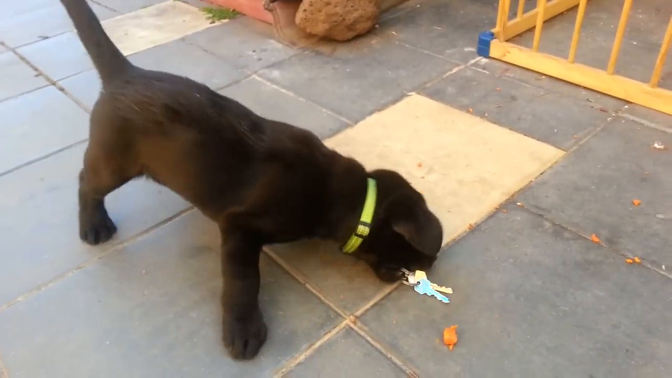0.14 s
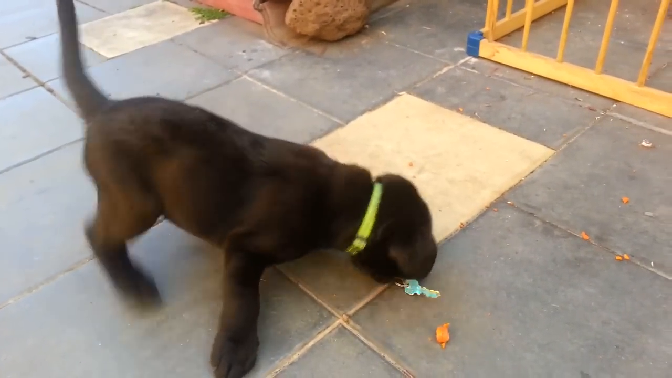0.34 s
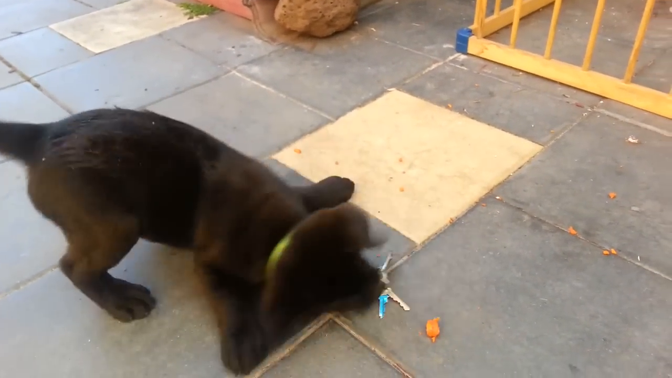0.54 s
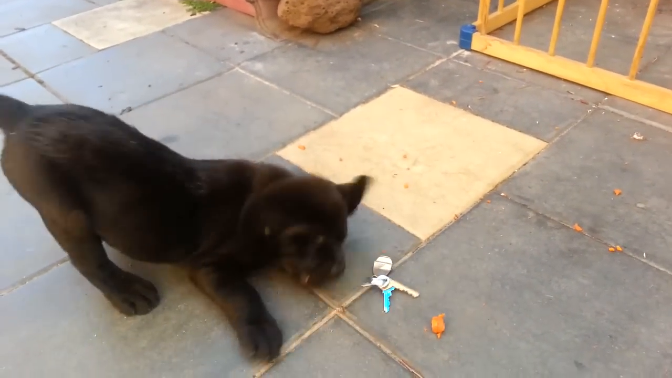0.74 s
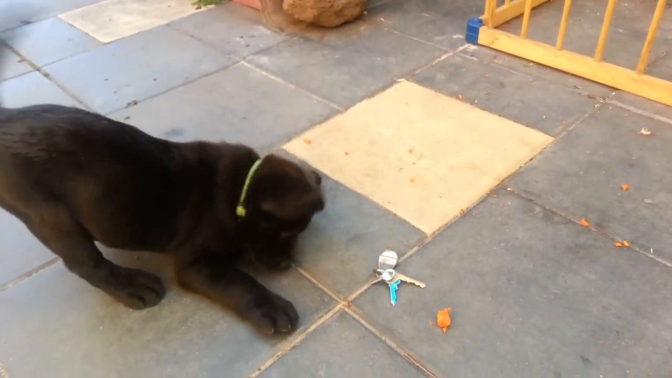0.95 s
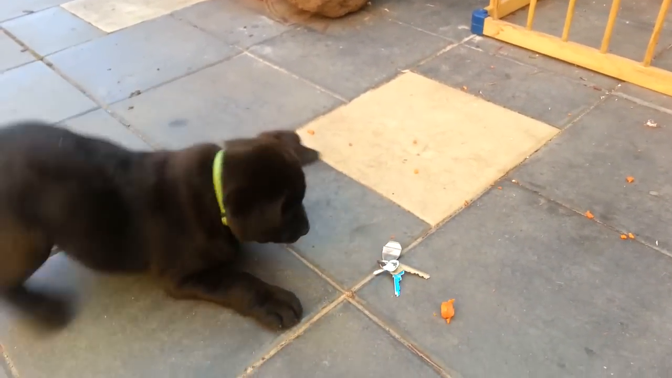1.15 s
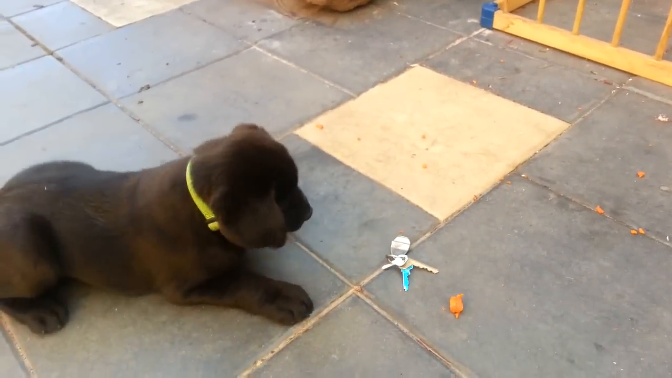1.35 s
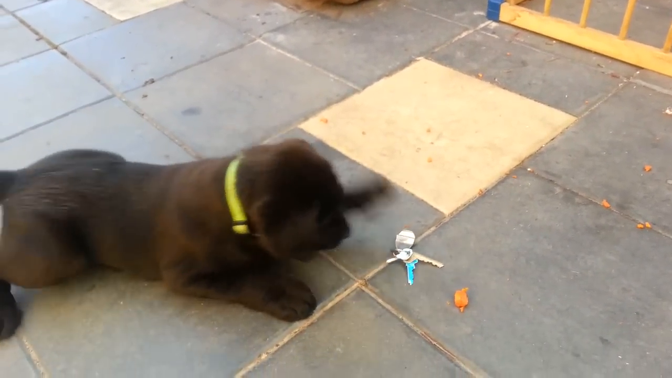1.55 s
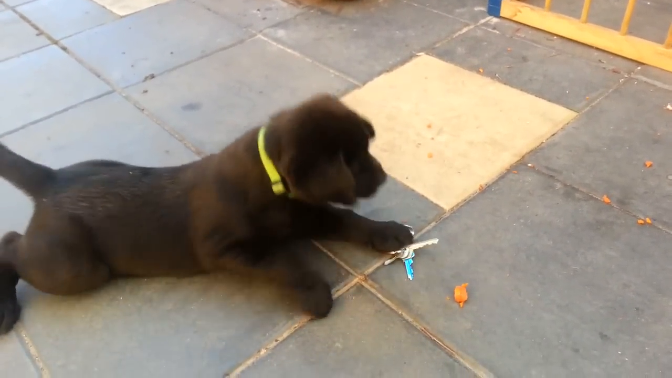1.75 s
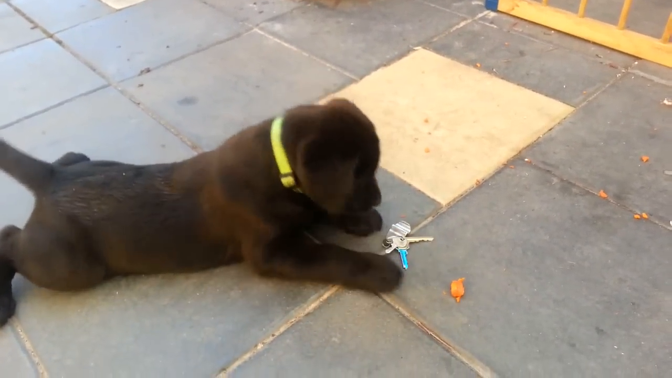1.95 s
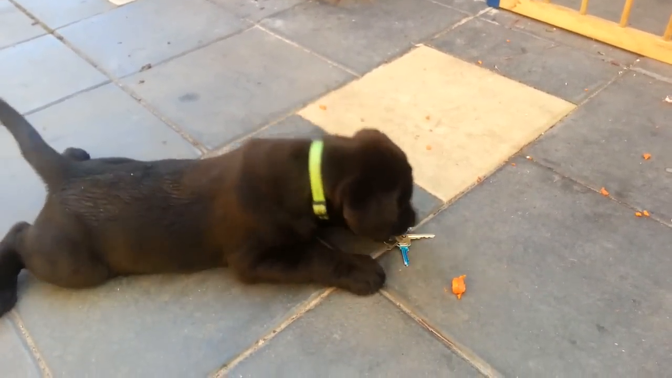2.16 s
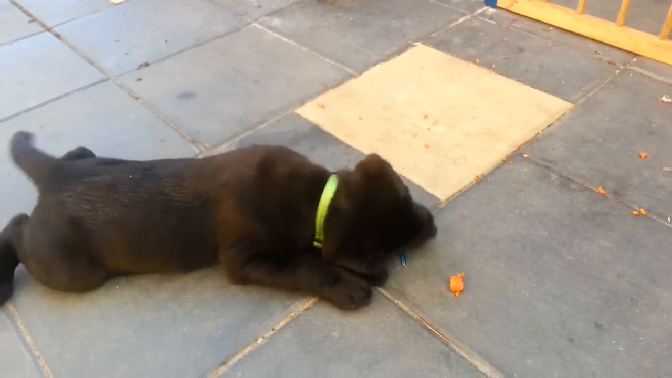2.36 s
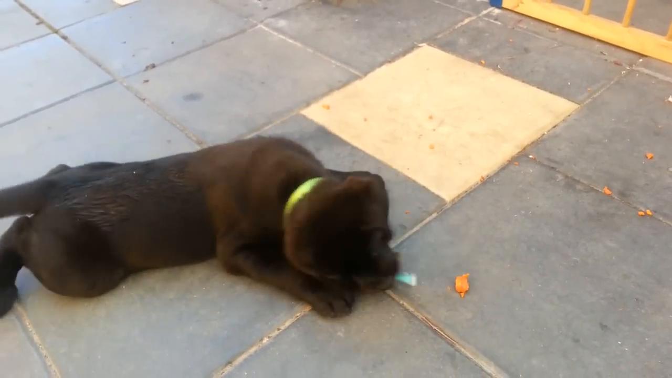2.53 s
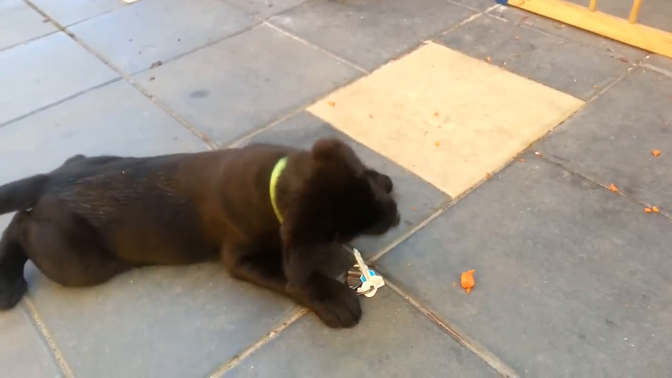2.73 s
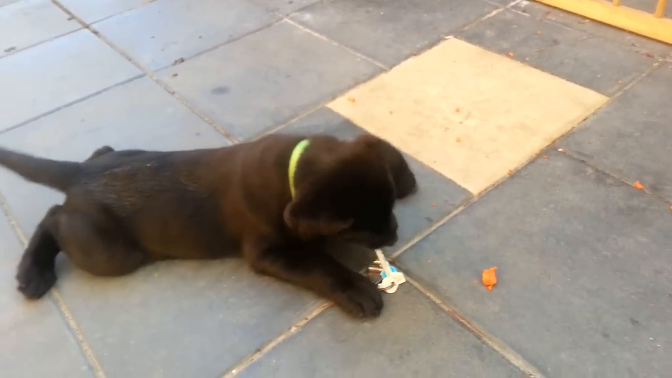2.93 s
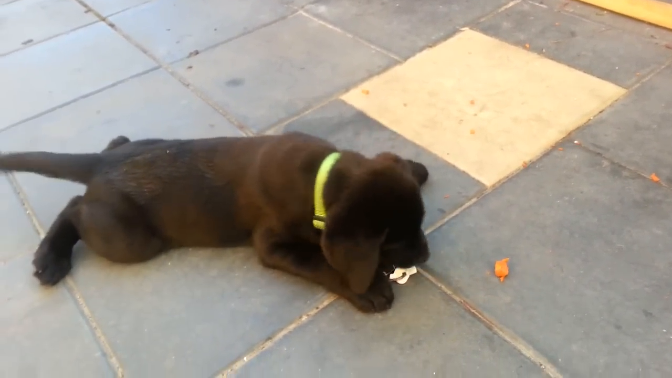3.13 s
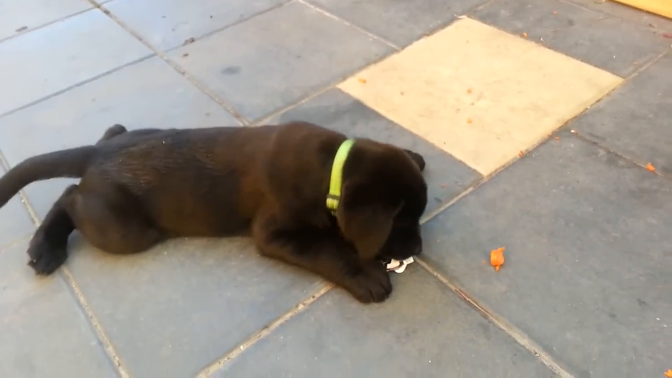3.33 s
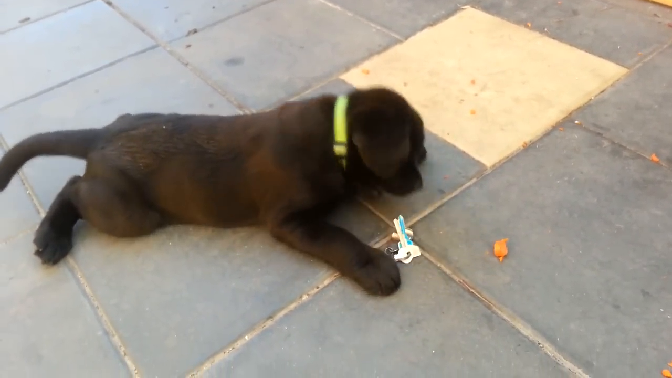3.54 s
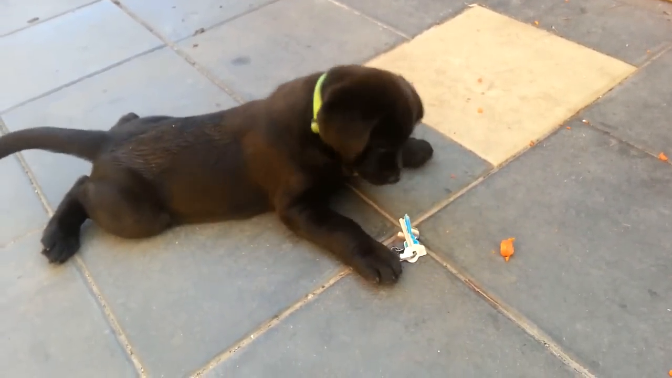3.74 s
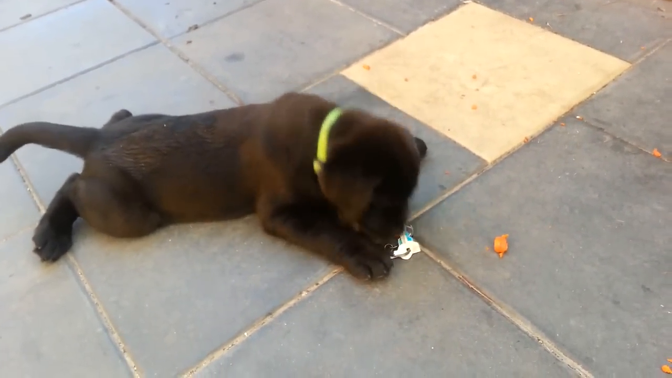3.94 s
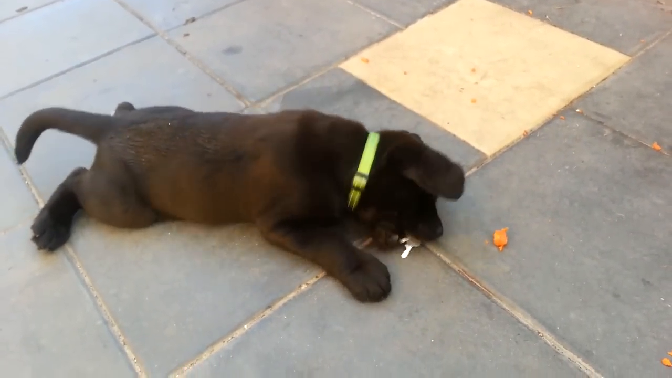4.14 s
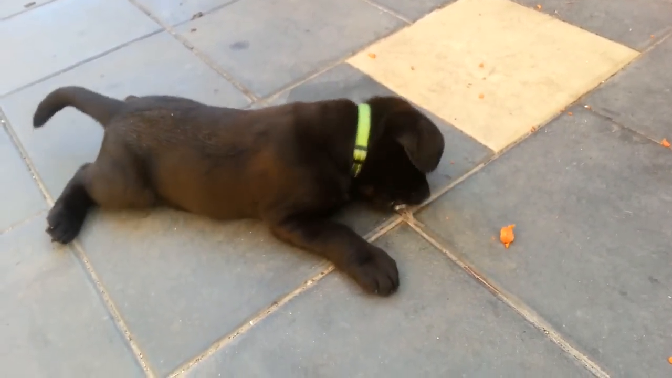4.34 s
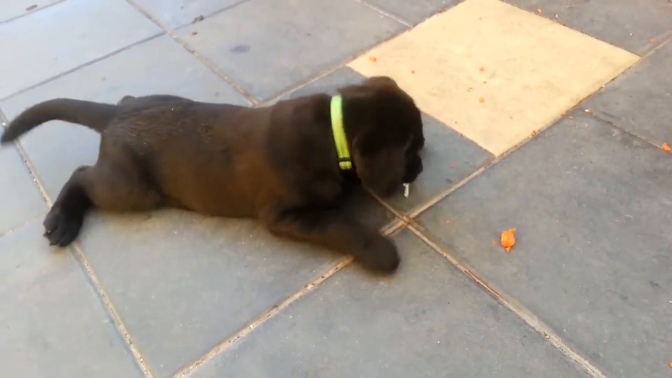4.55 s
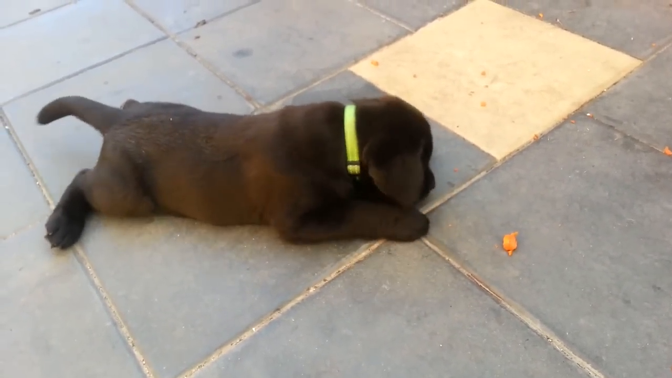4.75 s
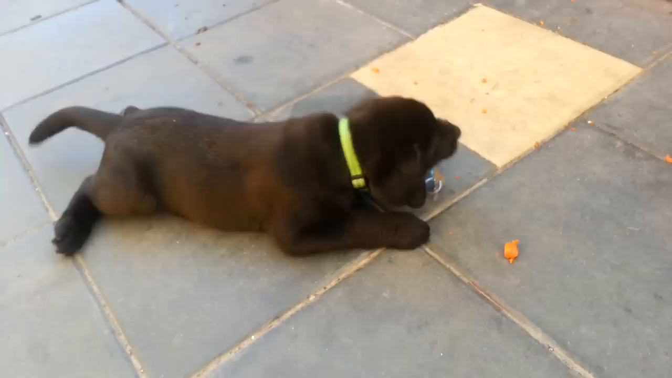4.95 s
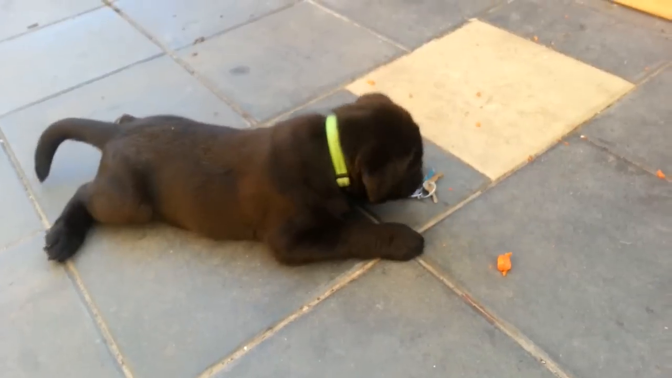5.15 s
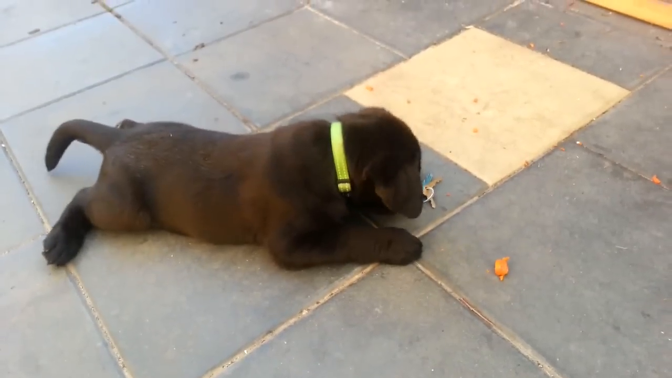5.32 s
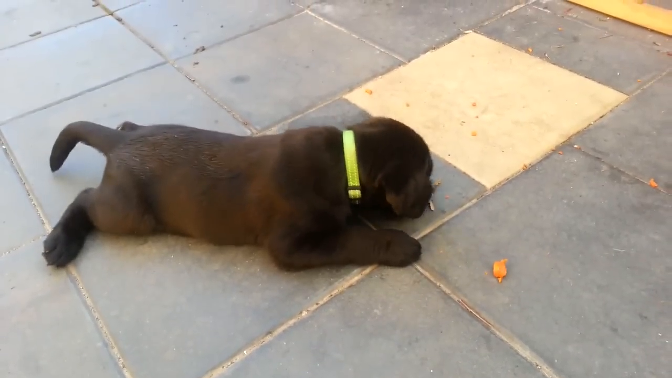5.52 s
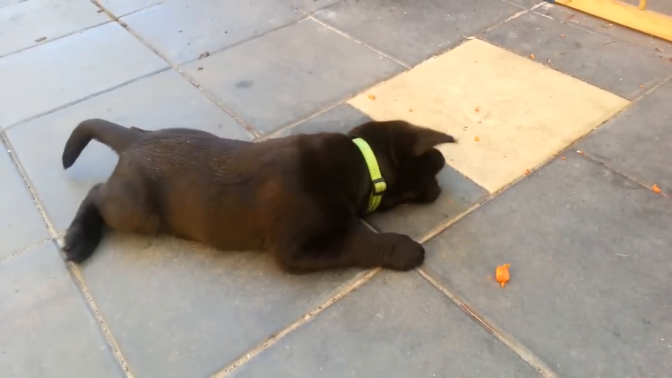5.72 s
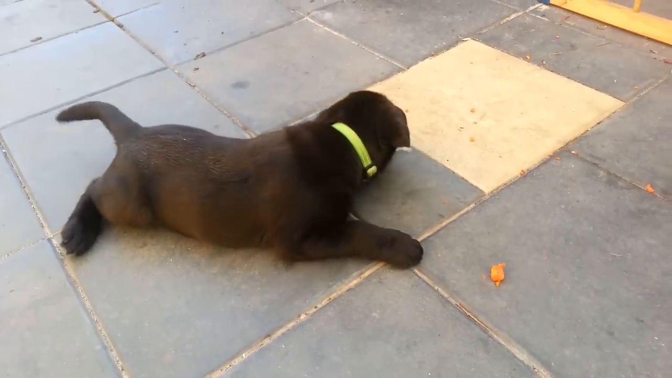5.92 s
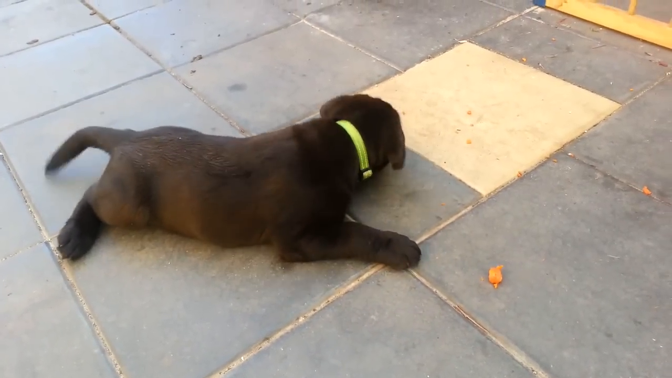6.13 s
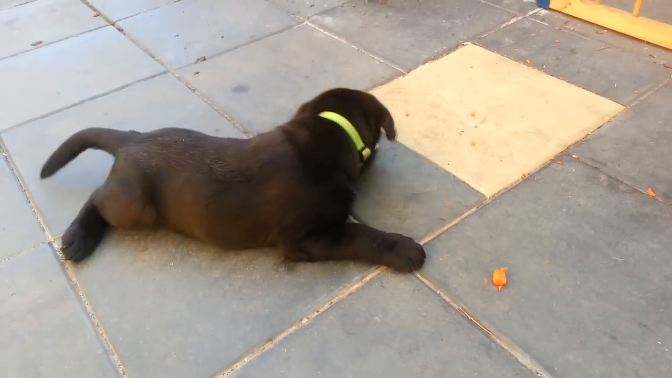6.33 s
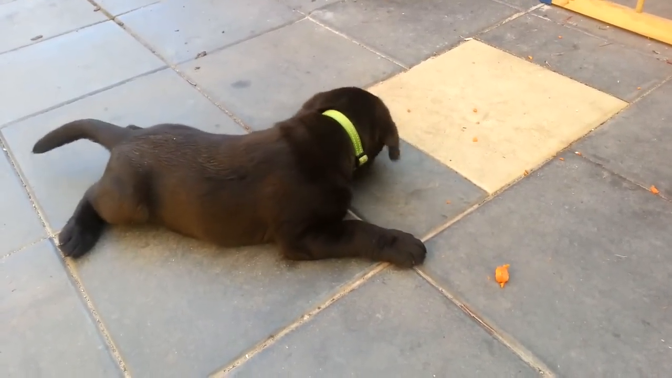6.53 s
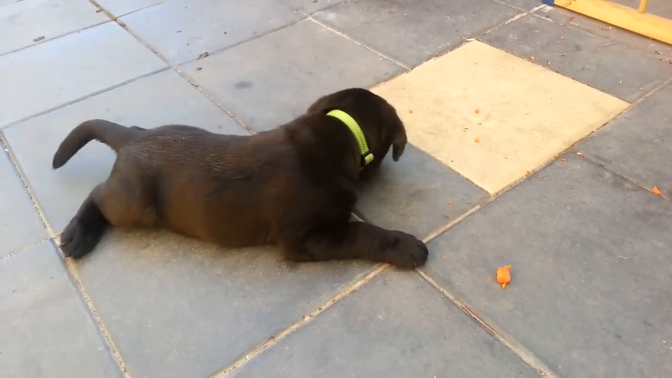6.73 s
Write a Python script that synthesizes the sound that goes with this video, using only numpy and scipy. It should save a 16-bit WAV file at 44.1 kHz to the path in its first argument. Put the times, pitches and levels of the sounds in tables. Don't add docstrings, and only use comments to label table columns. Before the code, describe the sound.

Quiet outdoor air, with faint distant traffic and breeze, opens the scene on a stone-paved yard. At 0.3 s a puppy starts shoving a bunch of keys: light jingles and grit scrape, growing to bright, hard clatter at 0.65-0.95 s. Soft stirring follows, with a faint bump near 1.3 s. A sharp clink and low paw thud land at 1.77 s, then a smaller jingle at 2.0 s. After a lull, a dense scraping rattle builds from 2.5 s and peaks around 2.7 s. Short separate clacks come at 3.3 and 3.6 s, then quiet. From 4.17 to 4.8 s there are irregular clinks and dry knocks, then bright jangles at 5.1 and 5.2 s. A soft gust passes near 5.65 s, thin dragging rings run from 5.85 to 6.2 s, and a faint tag bump at 6.55 s and tick at 6.7 s end in breeze. Close stereo microphone, short wall reflections.

```python
import sys
import numpy as np
from scipy import signal
from scipy.fft import rfft, irfft, next_fast_len
from scipy.io import wavfile
from scipy.ndimage import uniform_filter1d

SR = 44100
rng = np.random.default_rng(int(sys.argv[2]) if len(sys.argv) > 2 else 0)


def bounce(signal):
    frames = np.transpose(np.atleast_2d(signal))
    limited = np.clip(frames, -1, 1)
    pcm = np.round(limited * 32767).astype(np.int16)
    wavfile.write(sys.argv[1], SR, pcm)


def boost_factor(decibels):
    exponent = np.asarray(decibels, float) / 20
    return 10 ** exponent


N = 303345

# (frequency [Hz], density [dB per Hz])
AIR_SPECTRUM = [(20, -21.5), (65, -17.5), (158, -6), (316, 2.5), (404, -5.5), (722, -3), (1560, -8),
                (5870, -19), (13400, -17.5)]
# (frequency [Hz], likeness [-1..1])
AIR_LIKENESS = [(60, 0.7), (15000, -0.3)]
# (time [s], level [dB])
PORT_PUFFS = [
    (0, -62),
    (1.755, -72),
    (1.78, -52),
    (1.86, -66),
    (2.5, -70),
    (5.3, -65),
    (5.65, -56.5),
    (6.1, -72),
    (6.8, -59),
]
# (frequency [Hz], left-right difference [dB])
PORT_BALANCE = [(60, -5), (180, -4), (550, -0.5), (1650, -3.5), (4970, 0), (15000, 4.5)]
# (frequency [Hz], t60 [s])
YARD_DECAY = [(200, 0.91), (1000, 0.54), (4000, 0.44), (15000, 0.26)]
# (frequency [Hz], width [Hz], level [dB])
KEY_MODES = [(4620, 70, -14), (5480, 110, -7), (6410, 60, -4), (6535, 50, -1), (7572, 30, -9),
             (8300, 70, -8), (8760, 50, -2), (9036, 55, -5), (9193, 40, -3), (9492, 32, -2), (9826, 50, -2),
             (10320, 50, -4), (10464, 35, -1), (12385, 30, -10), (13566, 40, 0), (13820, 80, -2),
             (14037, 45, -4)]
# (frequency [Hz], width [Hz], level [dB])
TAG_MODES = [(321, 28, -16), (538, 24.7, -6.5), (670, 56, -7), (932.4, 24, -5), (1165, 59, -5),
             (1395, 330, -20), (1582, 23, -1), (2202, 55, -8), (2678, 190, -7), (3232, 42, -7),
             (3400, 44, -8), (3940, 250, -8.5)]
# (frequency [Hz], density [dB per Hz])
SCRAPE_SPECTRUM = [(150, -22), (340, -4.5), (1160, -1), (3100, -4.5), (3800, -2.5), (4600, -5.5),
                   (9760, -1.5), (11800, -5), (13800, -6.5)]
# (time [s], level [dB])
PAW_STIR = [(0, -69), (.29, -36), (.6, -39), (1.05, -40), (1.46, -51.5), (1.75, -41), (1.96, -39.5),
            (2.2, -51), (2.43, -44), (3.04, -46), (3.3, -52.5), (3.5, -46.5), (3.75, -56.5), (4.12, -90.5),
            (4.3, -69.5), (4.95, -45), (5.6, -70), (6.88, -100)]
# (peak [s], rise [s], hold [s], drag [dB], pitch that touches most [Hz])
KEY_DRAGS = [(.307, 0.023, 0.0046, -21.5, 9080), (.396, 0.043, 0.0046, -33, 8820),
             (.494, 0.37, 0.003, -35, 9100), (.671, 0.049, 0.0044, -18.5, 9880),
             (.764, 0.19, 0.047, -20.5, 8820), (.911, 0.035, 0.027, -21, 10420),
             (1.338, 0.21, 0.004, -39, 8310), (1.768, 0.0057, 0.0064, -13.5, 14600),
             (1.99, 0.29, .02, -38.5, 9500), (2.025, 0.017, 0.0046, -17.5, 8960),
             (2.69, 0.18, 0.0063, -11.5, 8870), (2.727, .05, 0.092, -22, 10350),
             (3.33, 0.019, 0.0028, -24, 14560), (3.545, 0.043, 0.066, -27, 6500),
             (4.175, 0.015, 0.022, -22.5, 9560), (4.27, 0.054, .15, -40.5, 10300),
             (4.433, 0.075, 0.0046, -31, 9100), (4.475, 0.018, 0.0058, -22, 9300),
             (4.535, 0.061, 0.0027, -12.5, 7570), (4.674, 0.048, .005, -27, 5020),
             (4.822, 0.053, 0.015, -35.5, 6120), (5.103, 0.078, 0.052, -19.5, 6440),
             (5.217, 0.065, 0.04, -17.5, 13640), (5.845, 0.016, 0.065, -24.5, 9830),
             (5.99, 0.15, 0.23, -24, 8890)]
# (peak [s], rise [s], hold [s], drag [dB], pitch that touches most [Hz])
TAG_DRAGS = [(.303, 0.0057, 0.021, -29.5, 1148), (.494, 0.18, 0.0023, -31.5, 1125),
             (.66, 0.23, 0.032, -27, 1165), (.764, 0.08, 0.0028, -21.5, 1515), (.8, .05, 0.034, -37, 1320),
             (.911, 0.14, 0.0063, -25, 1072), (1.338, 0.29, 0.0048, -41, 3930),
             (1.766, 0.0077, 0.0078, -24.5, 3400), (2.021, 0.032, 0.0045, -30, 1450),
             (2.655, 0.2, 0.029, -18.5, 1182), (2.76, 0.111, 0.046, -26, 1590),
             (3.33, 0.033, 0.0033, -31, 1663), (3.561, 0.11, 0.0037, -31, 1594),
             (3.623, 0.037, 0.0033, -25.5, 1610), (4.197, 0.073, 0.0087, -27, 1600),
             (4.42, 0.32, 0.024, -32, 1159), (4.515, 0.12, 0.0052, -17.5, 1618),
             (4.674, 0.015, 0.0041, -23.5, 2020), (4.822, 0.088, 0.0086, -32, 1194),
             (5.098, 0.057, 0.0034, -20, 3400), (5.22, 0.19, 0.041, -31.5, 1730),
             (5.85, 0.048, .15, -30, 2830), (6.04, 0.1, 0.17, -30.5, 1260), (6.548, .01, 0.046, -42.5, 992)]
# (time [s], length [s], pitch [Hz], rms [dB], left-right
# [dB])
LOW_TONES = [(0.296, 0.068, 1191, -31, -12), (0.298, 0.03, 1560, -35.5, 4), (0.514, 0.018, 1580, -32.5, -4),
             (0.6, 0.052, 1590, -39, -1), (0.658, 0.053, 2960, -37, -4), (0.677, 0.036, 1210, -33, -8),
             (0.757, 0.02, 1618, -28, 7), (0.757, 0.12, 943, -41, 0), (1.771, 0.1, 649, -39.5, 1),
             (1.808, 0.062, 3340, -38, -1), (2.02, 0.015, 1553, -31, -3), (2.555, 0.21, 1155, -38.5, 0),
             (2.618, 0.015, 1102, -26, 0), (2.641, 0.022, 2102, -26, 2), (2.675, 0.071, 2762, -25.5, -7),
             (2.762, 0.046, 1582, -27.5, -6), (3.321, 0.019, 1590, -32, -16),
             (3.56, 0.049, 1582, -30.5, -8), (3.745, 0.15, 1582, -41.5, -6), (3.557, 0.24, 1197, -47, -6),
             (3.628, 0.11, 1582, -23.5, -5), (4.186, 0.026, 1582, -27, -3.5), (4.197, 0.023, 1192, -32, -6),
             (4.411, 0.027, 1187, -41, 11), (4.503, 0.043, 1163, -32.5, -4), (4.509, 0.039, 2740, -40, -8),
             (4.668, 0.045, 4140, -33.5, 13), (4.824, 0.046, 1376, -45.5, -4), (4.992, 0.033, 1206, -45, 4),
             (6.111, 0.071, 1215, -37, 3),
             (2.55, 0.11, 655, -39.5, -4),
    (2.651, 0.021, 1582, -20, -8),
    (2.69, 0.012, 3100, -15, 14),
    (3.62, 0.19, 684, -50.5, -3),
    (5.1, 0.07, 3385, -48, 0),
    (5.11, .06, 4635, -43.5, 7),
    (5.21, 0.073, 5490, -41, 4),
    (6.035, 0.065, 1220, -46, 0.5),
    (6.544, 0.043, 1150, -41, 3),
]
# (time [s], length [s], pitch [Hz], rms [dB], left-right [dB])
KEY_TONES = [(0.302, 0.046, 8760, -32, 7), (0.388, 0.039, 8800, -28, 7), (0.394, 0.019, 9750, -30, 6),
             (0.665, 0.027, 14430, -24, 9.5), (0.773, 0.025, 14200, -21, 4.5),
             (0.773, 0.026, 12160, -23, 12.5), (0.775, 0.015, 14500, -19, 19.5),
             (0.777, 0.027, 10390, -23, 14), (0.781, 0.036, 9040, -20, 9.5),
             (0.929, 0.014, 6480, -21, -8.5), (1.762, 0.011, 8790, -21, 5), (1.818, 0.019, 8310, -23.5, 2),
             (2.02, 0.033, 8810, -29, 9), (2.026, 0.023, 13450, -31, 11), (2.646, 0.012, 13500, -21, 12),
             (2.672, 0.025, 9900, -17.5, 19), (2.682, 0.071, 8760, -35, -5), (2.718, 0.042, 13540, -17, 17),
             (2.744, 0.01, 6580, -19, -9), (2.768, 0.027, 8760, -18, 8), (2.77, 0.047, 9820, -28, 8),
             (2.8, 0.03, 6535, -29.5, -11), (2.802, 0.026, 13820, -31, 16), (3.327, 0.017, 13640, -29, 14),
             (4.247, 0.069, 9200, -39, 1), (4.468, 0.019, 9450, -25, 0), (4.548, 0.072, 9190, -25.5, 3),
             (4.672, 0.052, 10490, -33, 2), (5.101, 0.017, 10200, -15, 8), (5.209, 0.021, 13560, -16.5, 13),
             (5.096, 0.029, 6410, -23.5, -7), (5.211, 0.042, 9000, -23, 3.5),
             (5.247, 0.038, 9560, -22.5, 6), (5.238, 0.044, 13300, -24, 12), (5.263, 0.026, 10400, -25, 17),
             (5.263, 0.022, 14100, -28, 16), (5.841, 0.062, 9930, -29.5, 5), (5.851, 0.038, 8670, -33, -6),
             (5.973, 0.15, 13540, -31.5, 8), (6.147, 0.023, 13540, -28, 16)]
# (time [s], blow [dB], first key [Hz], ring [dB], second key [Hz])
KEY_CLINKS = [(.3017, -21.5, 8500, 6, 6400), (.3895, -17.5, 8640, -3, 6900), (.6005, -27, 7150, 2.5, 10100),
              (.6644, -22, 6420, 8, 10500), (.9033, 1.5, 6270, -7.5, 10270),
              (1.7645, -6.5, 14270, -5, 7050), (1.8068, -6, 6500, -26, 13650),
              (1.957, -25, 14100, -5, 7240), (2.0198, -15, 9830, 3.5, 6800),
              (2.4865, -28, 6740, -28.5, 9700), (2.5117, -31.5, 7200, 1.5, 10100),
              (2.7452, -15.5, 6440, 4, 10000), (2.8784, -23, 9700, -6.5, 6560),
              (3.3233, -16, 14970, -3, 6650), (4.191, -15, 6900, -4, 13580), (4.2657, -32, 4530, 8.5, 8860),
              (4.3061, -21, 10300, -11.5, 7500), (4.4293, -24, 9000, -8, 8300),
              (4.6944, -17.5, 6200, -5.5, 8700), (4.8174, -26, 6730, -18, 9650),
              (5.2096, -9.5, 13740, -1, 6540), (5.8287, -29.5, 6820, 8.5, 14200),
              (6.2244, -37, 8760, -3, 9900), (4.4205, -21.5, 2500, -22, 6000)]
# (time [s], blow [dB], key [Hz], ring [dB])
KEY_TICKS = [(0.536, -24.5, 7170, -2.5), (0.6513, -20, 7980, 0), (0.7727, -12.5, 9580, -2),
             (0.9276, -4.5, 5970, -15), (2.362, -34, 7300, -11), (2.449, -35, 7960, -1),
             (2.6476, -5, 6220, -4.5), (3.493, -36, 6760, -3), (3.533, -22, 6400, 7.5),
             (3.622, -12, 6820, -7.5), (3.945, -52.5, 7490, -5), (4.1668, -35, 7270, 9),
             (4.347, -29, 6400, -4), (4.4594, -26, 6000, -3), (4.471, -13.5, 8260, -20),
             (4.535, -10, 6160, -14), (4.6723, -5, 4450, -22), (5.082, -17.5, 5600, -11),
             (5.093, -6.5, 6240, 1), (5.7135, -41.5, 4670, -27.5), (5.8424, -24, 6500, 6),
             (6.72, -45, 7900, 0), (0.4873, -26, 6370, -6), (0.6313, -40, 6500, 3),
             (.7428, -17.5, 9910, -2), (.8581, -24, 13770, -1), (2.5457, -28.5, 6540, 0),
             (2.5948, -22, 14020, -12.5), (2.62, -23, 10200, 1), (2.655, -17.5, 6500, 4),
             (2.7188, -19, 13920, -5), (4.191, -19, 13900, -0.5), (4.3998, -32.5, 10320, -3),
             (4.5001, -17.5, 7040, -3), (4.6233, -27.5, 13570, -1)]
# (time [s], blow [dB], first part [Hz], ring [dB], second part [Hz])
TAG_KNOCKS = [(.486, -20.5, 1198, 7, 2470), (.675, -26.5, 1585, 4, 1170), (.738, -21, 1165, 2, 1180),
              (.756, -8.5, 2790, -4.5, 1526), (.903, -7, 1165, -4.5, 4220), (.929, -21.5, 1190, 5.5, 2820),
              (1.281, -42, 415, -26, 700), (1.770, -23.5, 1610, 3.5, 3400), (1.803, -22.5, 1585, 5.5, 3400),
              (2.676, -9, 2800, -4.5, 1580), (2.695, -6.5, 1600, -5.5, 2870), (3.33, -23, 2740, -6, 3300),
              (3.615, -5.5, 1566, -9.5, 2880), (4.166, -23, 1400, -6, 2700),
              (4.232, -13.5, 1516, -5.5, 2720), (4.671, -9, 1950, -17, 711), (5.091, -11, 3400, -6.5, 736),
              (1.769, -31, 321, 8, 624)]
# (time [s], blow [dB], tag [Hz], ring [dB])
TAG_BUMPS = [(0.3, -7, 1395, -5), (2.018, -31, 1582, 3), (2.08, -28.5, 1165, 1), (2.8, -32, 1150, 4),
             (2.647, -8, 1680, -25.5), (3.311, -27.5, 1050, -21), (4.076, -32, 590, -33),
             (4.409, -26, 1750, -12), (5.054, -29.5, 1110, 1.5), (5.0805, -22, 1400, -26.5),
             (6.542, -26, 1010, -19), (3.633, -21, 2600, 1), (6.606, -33.5, 870, -10),
             (2.666, -11, 2750, -4), (2.607, -17, 1300, -13), (3.6505, -26, 2800, 2),
             (2.777, -19.5, 3200, -7), (2.85, -25, 1645, -4)]

SIDES = np.array([[.5], [-.5]])
PORT_LAG_S = .00015
FLAT_HZ = 13700
AIR_DB = -54.5
RISE_DB = 30
KEY_FALL_DB_PER_S, TAG_FALL_DB_PER_S = 250, 157.5
STIR_KEYS_DB, STIR_KEY_HZ, STIR_TAG_HZ = -8.5, 8330, 1051
SPLIT_HZ = 4500
SING_RISE_S, SING_SAG_DB, DAMP_DB_PER_S = 0.004, -9.5, 899
SECOND_KEY_DB, SECOND_PART_DB = -8.5, -3.5
JARRED_KEY_HZ, JARRED_KEY_DB, JARRED_RIM_HZ, JARRED_RIM_DB = 9700, -44.5, 2390, -28
EDGE_HZ, CUT_HZ = 14700, 260


def evened(x):
    return x / np.sqrt(np.mean(x ** 2) + 1e-20)


def read(points, hz):
    f, value = np.transpose(points)
    return np.interp(np.log(np.minimum(hz, FLAT_HZ) + 1), np.log(f + 1), value)


def colour(x, gain):
    size = next_fast_len(x.shape[-1])
    spectrum = rfft(x, size) * gain(np.fft.rfftfreq(size, 1 / SR))
    return irfft(spectrum, size)[..., :x.shape[-1]]


def drift(per_s):
    knots = rng.standard_normal(int(N / SR * 60) + 2)
    smooth = signal.lfilter([1], [1, -np.exp(-per_s / 20)], knots)
    return np.interp(np.arange(N) / SR * 60, np.arange(len(knots)), evened(smooth))


def near(hz, centre_hz, octaves, floor_db):
    bell = np.exp(-(np.log2(hz / centre_hz) / octaves) ** 2)
    return np.maximum(bell, boost_factor(floor_db))


def ring(x, hz, width):
    r = np.exp(-np.pi * max(width, 4) / SR)
    phasor = signal.lfilter([1], [1, -r * np.exp(2j * np.pi * hz / SR)], x)
    return np.sqrt(2 * (1 - r * r)) * phasor


def air():
    frames, hz = N // 256 + 5, np.fft.rfftfreq(1024, 1 / SR)
    a, b, c, d, patches = rng.standard_normal((frames, 513, 5)).T
    patches = evened(uniform_filter1d(uniform_filter1d(patches, 10, 0), 14, 1))
    same = np.clip(read(AIR_LIKENESS, hz), -1, 1)[:, None]
    left = a + 1j * b
    right = same * left + np.sqrt(1 - same ** 2) * (c + 1j * d)
    z = np.array([left, right]) * boost_factor(read(AIR_SPECTRUM, hz)[:, None] + 2.2 * patches)
    swell = boost_factor(AIR_DB + 1 + 0.98 * drift(0.49))
    return swell * evened(signal.istft(z, nperseg=1024, noverlap=768)[1][:, :N])


def puffs(tag_db):
    s, db = np.transpose(PORT_PUFFS)
    noise = rng.standard_normal((3, N))
    low = colour(0.6 * noise[0] + noise[1:], lambda f: near(f + 1, 150, 2.67, -72))
    lumpy = evened(low * boost_factor(2.7 * drift(25)))
    deep = evened(colour(lumpy, lambda f: near(f + 1, 65, 1.3, -np.inf)))
    breeze = lumpy * boost_factor(np.interp(np.arange(N) / SR, s, db))
    return breeze + deep * boost_factor(tag_db - 44.5)


def moving(shoves, fall_db_per_s, stir_db, stir_hz):
    t = np.arange(0, N / SR + .002, .001)
    s, rise, hold, db, hz = np.transpose(shoves)[..., None]
    climb = RISE_DB * np.maximum(s - t, 0) / np.maximum(rise, .002)
    fall = fall_db_per_s * np.maximum(t - s - abs(hold), 0)
    stirring = np.interp(t, *np.transpose(PAW_STIR)) + stir_db
    each = np.vstack([db - climb - fall, stirring])
    level_db = 10 * np.log10(boost_factor(2 * each).sum(0))
    touch_hz = np.append(hz, stir_hz)[each.argmax(0)]
    return [np.interp(np.arange(N) / SR, t, c) for c in (level_db, touch_hz)]


def controls():
    keys_db, key_hz = moving(KEY_DRAGS, KEY_FALL_DB_PER_S, STIR_KEYS_DB, STIR_KEY_HZ)
    tag_db, tag_hz = moving(TAG_DRAGS, TAG_FALL_DB_PER_S, 0, STIR_TAG_HZ)
    return keys_db, tag_db, key_hz, tag_hz


def grit(per_s, spread_db):
    size = boost_factor(spread_db * np.minimum(rng.exponential(1, N), 4)) * rng.choice([-1., 1.], N)
    return evened(size * (rng.random(N) < per_s / SR))


def dragged(modes, level_db, touch_hz, sharp, wander_db, octaves, floor_db, per_s):
    out = np.zeros((2, N))
    for hz, width, db in modes:
        reach = boost_factor(db + wander_db * drift(51)) * near(hz, touch_hz, octaves, floor_db) * np.sqrt(width)
        z = ring(grit(per_s, 6.4) * boost_factor(level_db) * reach, hz, sharp * width)
        lag = np.tanh(hz / 1800) * (drift(1.95) + hz / 900)
        aim = boost_factor(10.0 * SIDES * drift(18.0) + SIDES * read(PORT_BALANCE, hz))
        out += (z * np.exp(1.5j * SIDES * lag) * aim).real
    return out / np.sqrt(sum(boost_factor(2 * db) * width for hz, width, db in modes))


def scrape(keys_db, tag_db, tag_hz, patchy_db):
    shared = grit(6000, 3.0)
    grains = np.array([[like * shared + grit(9000, 5.9) for port in SIDES] for like in (.5, 1.6)])
    hz, t, z = signal.stft(grains, SR, nperseg=512, noverlap=384)
    patches = rng.standard_normal((len(t), len(hz))).T
    patches = uniform_filter1d(patches, size=2, axis=0)
    patches = evened(uniform_filter1d(patches, size=14, axis=1))
    high = 1 / np.sqrt(1 + (SPLIT_HZ / (hz + 1)) ** 8)[:, None]
    touch_hz = np.interp(t * SR, np.arange(N), tag_hz)
    z[0] *= high * boost_factor(SIDES * read(PORT_BALANCE, hz))[..., None]
    z[1] *= np.sqrt(1 - high ** 2) * near(hz[:, None] + 1, touch_hz, 3.5, -0.52)
    depth_db = patchy_db * np.array([1, .45])[:, None, None, None]
    z *= boost_factor(read(SCRAPE_SPECTRUM, hz)[:, None] + depth_db * patches)
    fine, coarse = signal.istft(z, SR, nperseg=512, noverlap=384)[1][..., :N]
    return evened(fine) * boost_factor(keys_db - 8.5) + evened(coarse) * boost_factor(tag_db - 10.5)


def sings(events, chatter, chatter_hz, unlike):
    out, t = np.zeros((2, N + SR)), np.arange(SR // 5) / SR
    luck = rng.standard_normal((len(events), 3, len(t)))
    for (s, length, hz, db, pan_db), (a, b, c) in zip(events, luck):
        nearest_hz = min((mode[0] for mode in KEY_MODES), key=lambda f: abs(f - hz))
        hz = nearest_hz if abs(nearest_hz / hz - 1) < .03 else hz
        shake = 1 + chatter * ring(a + 1j * b, 0, chatter_hz) / 2
        sag_db = SING_SAG_DB * np.minimum(t / max(length, .004), 1)
        choke_db = DAMP_DB_PER_S * np.maximum(t - length, 0)
        envelope = -np.expm1(-t / SING_RISE_S) * boost_factor(db + sag_db - choke_db)
        z = np.sqrt(2) * shake * envelope * np.exp(2j * np.pi * hz * t)
        turn = 2 * np.pi * hz * PORT_LAG_S + np.clip(unlike, 0, .6) * c[0]
        ports = boost_factor(SIDES * pan_db) * np.exp(1j * SIDES * turn)
        at = round(s * SR)
        out[:, at:at + len(t)] += (z * ports).imag * np.sqrt(2) / np.linalg.norm(ports)
    return out[:, :N]


def blows_of(doubles, second_db, singles, jarred_hz, jarred_db):
    return [(*row, second_db) for row in doubles] + [(*row, jarred_hz, jarred_db) for row in singles]


def struck(events, modes, crack_s, crack_octaves, octaves, floor_db, sharp, unlike, lead, broad):
    out, t = np.zeros((2, N + SR)), np.arange(SR // 2) / SR
    hz, width, db = np.transpose(modes)
    luck = rng.standard_normal((len(events), 3, 2, len(modes)))
    snap = rng.standard_normal((len(events), 3, 1024))
    decay = np.exp(np.outer(2j * np.pi * hz - np.pi * sharp * width, t))
    tones = decay * -np.expm1(-t / crack_s)
    for (s, blow_db, low_hz, ring_db, high_hz, high_db), chance, noise in zip(events, luck, snap):
        share = min(boost_factor(high_db), .97)
        crack_wide = crack_octaves * np.clip(boost_factor(-.4 * ring_db), .8, 3)
        middle_hz = np.sqrt(low_hz * max(high_hz * share, low_hz))

        def both(f, wide, floor):
            first = np.sqrt(1 - share ** 2) * near(f + 1, low_hz, wide, floor)
            second = share * near(f + 1, high_hz, wide, floor)
            return (first + second) * boost_factor(SIDES * read(PORT_BALANCE, f))

        def crack_gain(f):
            return both(f, crack_wide, -50) + broad * near(f + 1, middle_hz, 0.81, -np.inf)

        burst = (noise[0] + unlike * noise[1:]) * np.exp(-t[:1024] / crack_s)
        burst[:, 0] += 7.0
        burst = colour(np.roll(burst, 64, 1), crack_gain)
        weight = both(hz, octaves, floor_db) * boost_factor(.5 * db + 3 * chance[0])
        spread = 2 * unlike * np.tanh(hz / 1800) * chance[2]
        phase = chance[1, 0] + spread + SIDES * 2 * np.pi * hz * PORT_LAG_S
        ringing = ((weight * np.exp(1j * phase)) @ tones).imag / np.linalg.norm(weight.mean(0))
        sound = np.roll(boost_factor(ring_db) * ringing, 64, 1)
        sound[:, :1024] += burst / abs(burst.mean(0)).max()
        at = round((s - lead) * SR)
        out[:, at:at + len(t)] += sound * boost_factor(blow_db)
    return out[:, :N]


def yard(x):
    taps = np.zeros((2, SR // 2))
    at = np.arange(200, SR // 2 - 20, 20) + rng.integers(0, 20, (2, (SR // 2 - 201) // 20))
    np.put_along_axis(taps, at, rng.choice([-1., 1.], at.shape), 1)
    hz, t, z = signal.stft(taps, SR, nperseg=256)
    t60 = np.maximum(read(YARD_DECAY, hz), .05)[:, None]
    tail = signal.istft(z * boost_factor(-60 * t / t60), SR, nperseg=256)[1]
    return signal.fftconvolve(x, tail / np.linalg.norm(tail[0]), axes=1)[:, :N]


def small_source(f):
    no_bass = 1 / np.sqrt(1 + (CUT_HZ / (f + 1)) ** 8)
    return no_bass * (1 - 0.52 * near(f + 1, 3890, 0.15, -np.inf))


def scene():
    keys_db, tag_db, key_hz, tag_hz = controls()
    keys = boost_factor(-7.0) * dragged(KEY_MODES, keys_db, key_hz, sharp=0.94, wander_db=4.0,
                               octaves=0.033, floor_db=-10, per_s=2900)
    tag = boost_factor(-2.0) * dragged(TAG_MODES, tag_db, tag_hz, sharp=1.0, wander_db=0.0,
                              octaves=0.093, floor_db=-11.5, per_s=1100)
    moved = keys + tag + scrape(keys_db, tag_db, tag_hz, patchy_db=4.5)
    key_blows = blows_of(KEY_CLINKS, SECOND_KEY_DB, KEY_TICKS, JARRED_KEY_HZ, JARRED_KEY_DB)
    clinks = struck(key_blows, KEY_MODES, crack_s=0.0021, crack_octaves=0.23, octaves=0.045,
                    floor_db=-23.5, sharp=0.88, unlike=1.0, lead=.0007, broad=0.19)
    tag_blows = blows_of(TAG_KNOCKS, SECOND_PART_DB, TAG_BUMPS, JARRED_RIM_HZ, JARRED_RIM_DB)
    knocks = struck(tag_blows, TAG_MODES, crack_s=0.0028, crack_octaves=0.22, octaves=0.054,
                    floor_db=-27, sharp=0.95, unlike=0.58, lead=-0.00043, broad=0.25)
    sung = sings(KEY_TONES, chatter=0.51, chatter_hz=59.7, unlike=0.56)
    sung = sung + sings(LOW_TONES, chatter=0.56, chatter_hz=41.0, unlike=0.44)
    to_walls = boost_factor(-8.5) * clinks + boost_factor(-10.5) * knocks + boost_factor(-8.5) * moved + boost_factor(-11.5) * sung
    bunch = colour(moved + clinks + knocks + sung + yard(to_walls), small_source)
    duck = boost_factor(-.3 * np.maximum(keys_db + 48.5, 0))
    return bunch + air() * duck + puffs(tag_db)


def thrift(x, under_db, loud_db):
    z = signal.stft(x, nperseg=2048, noverlap=1024)[2]
    bands = (abs(z[:, :1024]) ** 2).mean(0).reshape(128, 8, -1).mean(1) + 1e-14
    mask = uniform_filter1d(bands, size=31, axis=0)
    masked = (bands < mask * boost_factor(2 * under_db)) & (mask > boost_factor(2 * loud_db))
    masked[:26] = False
    z[:, :1024] *= ~np.repeat(masked, 8, axis=0)
    return signal.istft(z, nperseg=2048, noverlap=1024)[1][:, :N]


def band_limit(x):
    return signal.sosfilt(signal.butter(12, 16020, fs=SR, output="sos"), x)


def record(dry):
    thinned = thrift(np.clip(dry, -1, 1), under_db=-9.5, loud_db=-80)
    mix = colour(thinned, lambda f: np.maximum(1 / (1 + (f / EDGE_HZ) ** 160), boost_factor(-38)))
    return band_limit(mix)


dry = scene()
out = record(dry)
bounce(out)
```